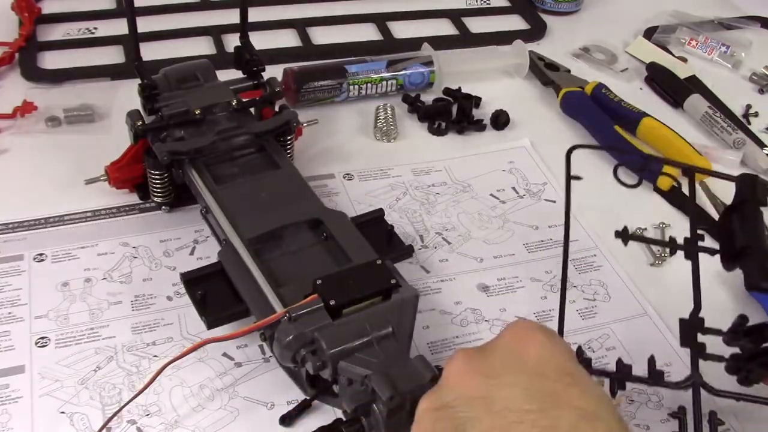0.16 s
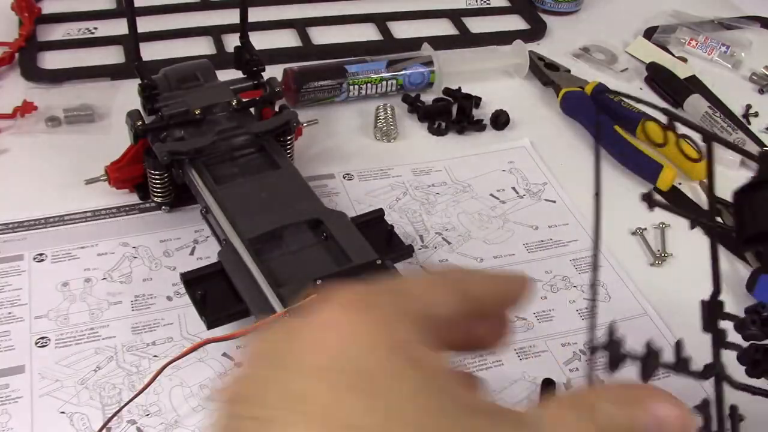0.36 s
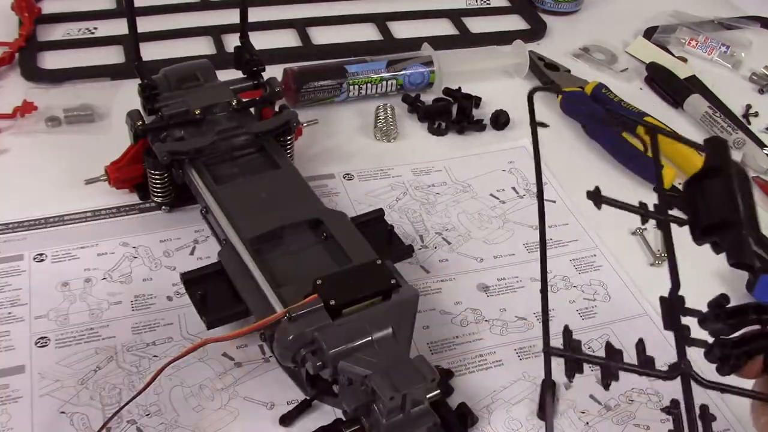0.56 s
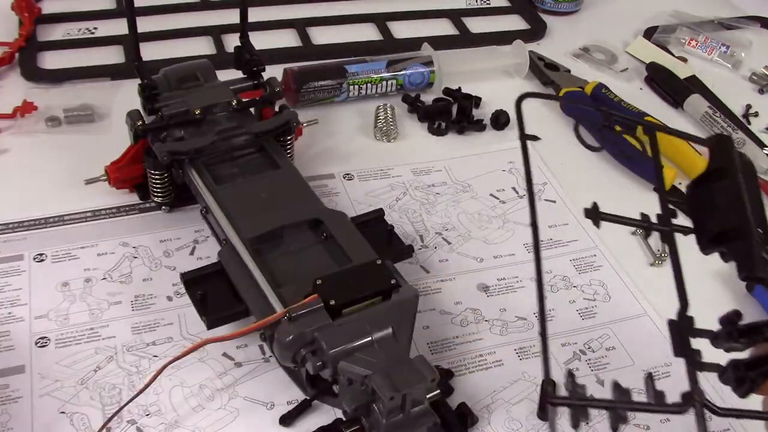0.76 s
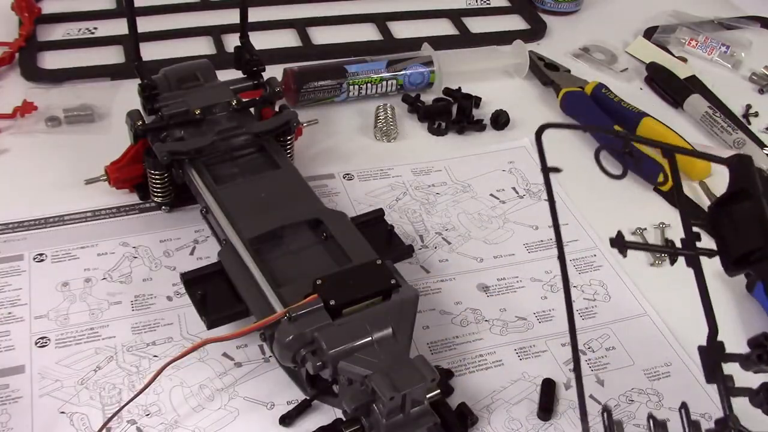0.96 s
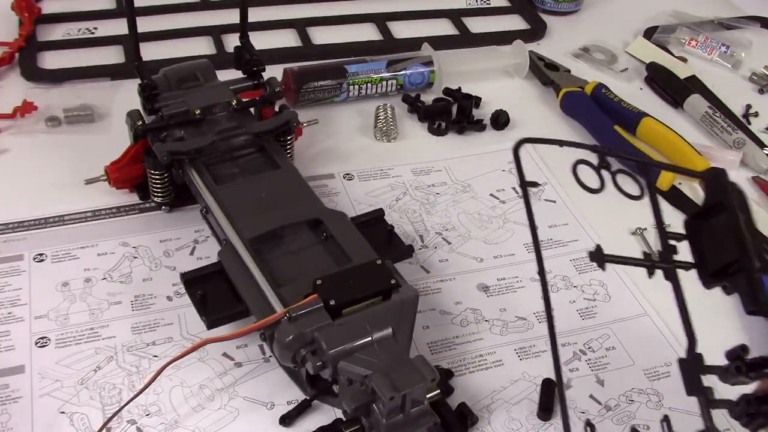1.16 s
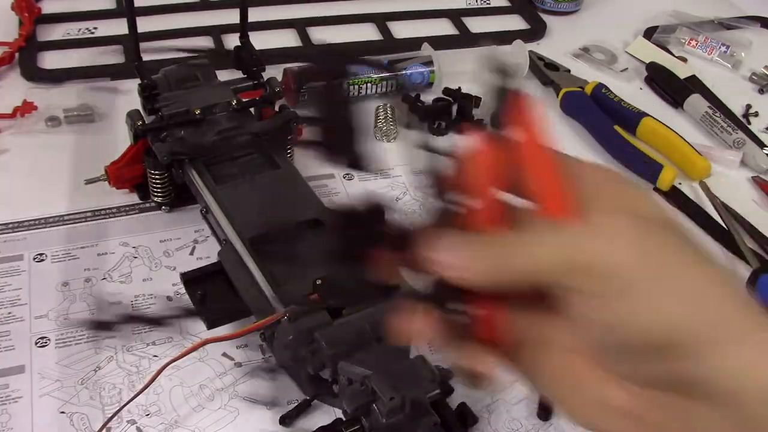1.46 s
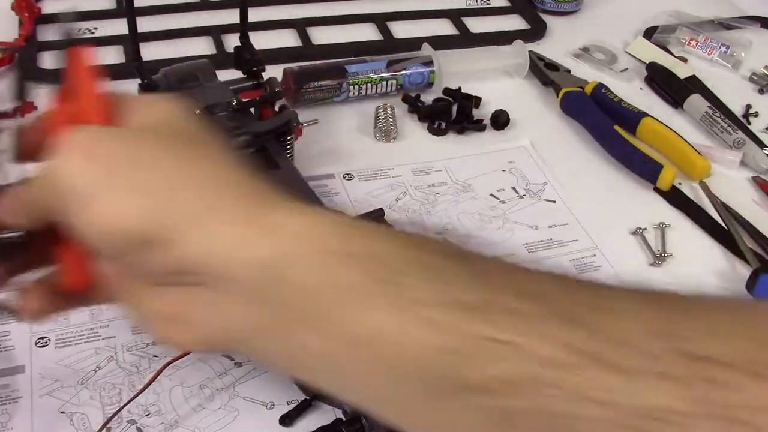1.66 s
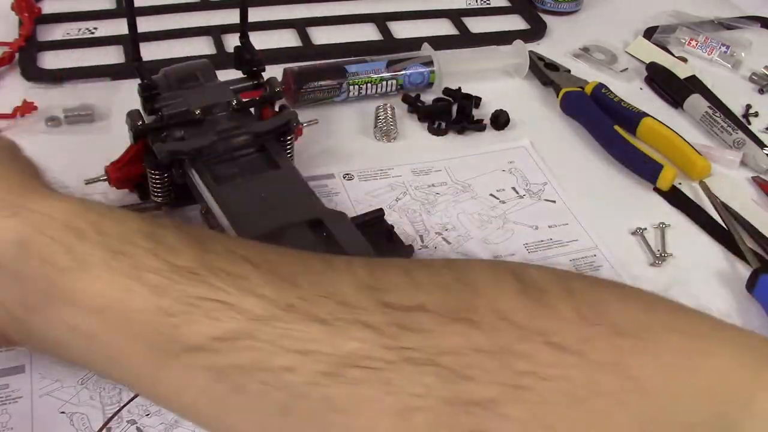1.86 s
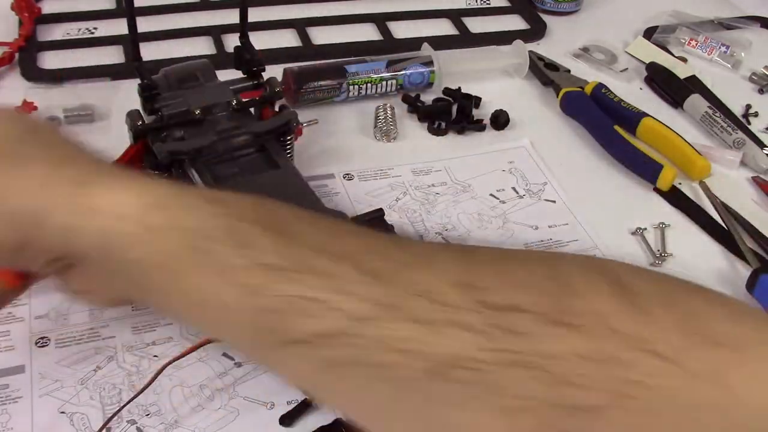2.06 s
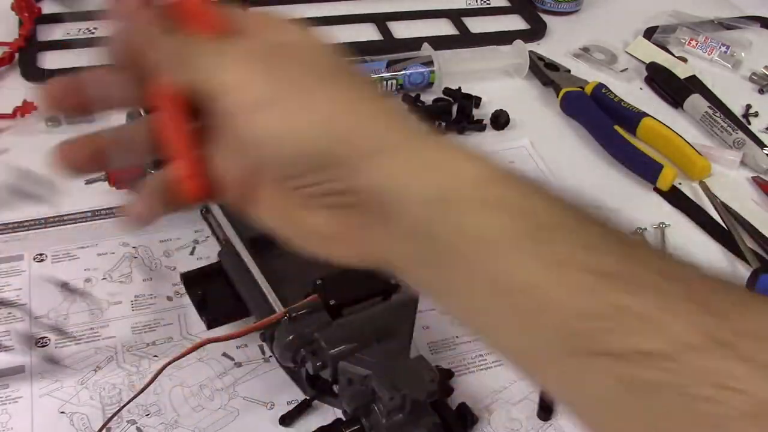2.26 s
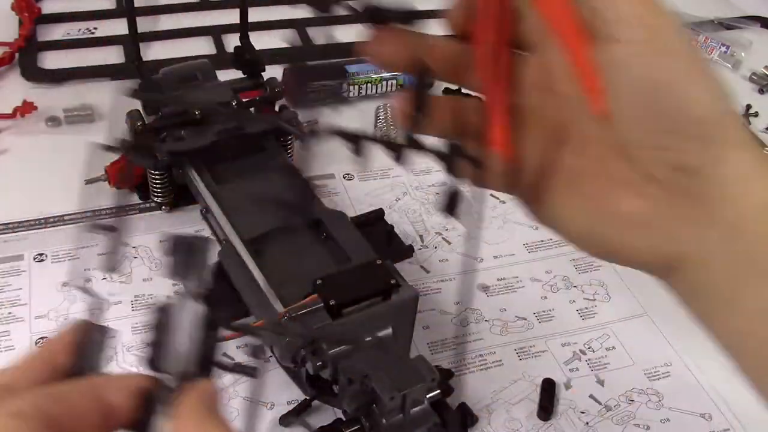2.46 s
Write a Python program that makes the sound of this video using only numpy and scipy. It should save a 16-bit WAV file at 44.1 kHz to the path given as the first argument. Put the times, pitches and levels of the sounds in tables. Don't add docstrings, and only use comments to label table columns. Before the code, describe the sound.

Light plastic parts snap and tick, an arm rustles past, then a plastic frame drops clattering

```python
import sys
import numpy as np
from scipy import signal
from scipy.fft import rfft, irfft
from scipy.io import wavfile
from scipy.ndimage import uniform_filter1d, map_coordinates

SR = 44100
rng = np.random.default_rng(int(sys.argv[2]) if len(sys.argv) > 2 else 0)


def attenuation_scalar(level_db):
    decades = np.asarray(level_db, float) / 20
    return 10 ** decades


def transcribe(signal):
    frames = np.atleast_2d(signal).T
    limited = np.clip(frames, -1, 1)
    pcm = np.round(limited * 32767).astype(np.int16)
    wavfile.write(sys.argv[1], SR, pcm)


N = 114660


def unit(x):
    return x / np.sqrt(np.mean(x ** 2) + 1e-20)


def wobble(rate_hz):
    knots = rng.standard_normal(int(N * rate_hz / SR) + 4)
    return map_coordinates(knots, [np.arange(N) * rate_hz / SR])


def noise(spectrum, patchy_db, size=N):
    z = signal.stft(rng.standard_normal(size + 1024), nperseg=512)[2]
    patches = uniform_filter1d(rng.standard_normal(z.shape), size=6, axis=0)
    patches = uniform_filter1d(patches, size=8, axis=1)
    x = signal.istft(z * attenuation_scalar(patchy_db * unit(patches)), nperseg=512)[1]
    f, db = np.transpose(spectrum)
    hz = np.fft.rfftfreq(len(x), 1 / SR)
    gain_db = np.interp(np.log(hz + 1), np.log(f + 1), db, -120, -120)
    coloured = irfft(rfft(x) * attenuation_scalar(gain_db), len(x))
    return unit(coloured[512:][:size])


def add(track, start_s, sound):
    part = track[round(start_s * SR):][:len(sound)]
    part += sound[:len(part)]


def ring(hz, t60_s, attack_s, rough):
    t = np.arange(SR // 8) / SR
    drift = rough * np.cumsum(rng.standard_normal(len(t))) / np.sqrt(SR)
    return np.sin(2 * np.pi * hz * t + drift) * attenuation_scalar(-60 * t / t60_s) * (1 - np.exp(-t / attack_s))


# pitch_hz [Hz], level_db [dB per Hz]
HISS_COLOUR = [(120, -46), (200, -3), (519, -7), (2170, -9), (6520, -13), (11700, -27), (16000, -24)]


def hiss():
    return attenuation_scalar(-62.5) * noise(HISS_COLOUR, patchy_db=4.0)


# time_s [s], rustle_db [dB], brightness_db [dB], air_stirred_db [dB]
ARM_MOTION = [(0, -41, 1, 1), (.09, -44, 3.5, -4), (.14, -49.5, -2, 11.5), (.25, -39.5, -1, -3.5),
              (.33, -45.5, -4.5, 5), (.43, -50, 6, 10.5), (.5, -44, 2.5, 3), (.6, -37.5, -2.5, 1.5),
              (.885, -39, -5, 0), (.95, -51, -3, 8.5), (1.1, -53.5, 2, 7.5), (1.31, -46, -2.5, 0.5),
              (1.4, -39, -3, -1.5), (1.67, -33, 1.5, -1), (1.86, -37.5, 1.5, -3), (1.94, -42.5, -3, 4),
              (2.1, -37, -2, -2), (2.6, -37, -5.5, -1)]
# pitch_hz [Hz], level_db [dB per Hz]
CLOTH_COLOUR = [(88, 2), (180, -3.5), (310, -2.5), (519, 0), (800, -4), (1500, -9), (2500, -19.5),
                (3900, -27), (6600, -120)]
# pitch_hz [Hz], level_db [dB per Hz]
FIZZ_COLOUR = [(1700, -12.5), (3310, 0), (4050, 1.5), (5000, -4.5), (6760, -6), (8480, -6.5),
               (12200, -15.5), (16000, -27)]
# pitch_hz [Hz], level_db [dB per Hz]
AIR_COLOUR = [(8.8, -18), (15, 3.5), (30, 0.5), (47, -5.5), (70, -12.5), (250, -21), (320, -50),
              (550, -120)]


def arm():
    time_s, *columns = np.transpose(ARM_MOTION)
    level_db, bright_db, air_db = [np.interp(np.arange(N) / SR, time_s, c) for c in columns]
    shared_db = level_db + 0.76 * wobble(35.34)
    body_db = shared_db + 0.89 * wobble(60)
    body = attenuation_scalar(body_db) * noise(CLOTH_COLOUR, patchy_db=0.54)
    fizz_db = shared_db + bright_db - 7.5 + 0.58 * wobble(150)
    fizz = attenuation_scalar(fizz_db) * noise(FIZZ_COLOUR, patchy_db=1.5)
    lumpy_db = level_db + air_db + 1 + 1.8 * wobble(30.0)
    air = attenuation_scalar(lumpy_db) * noise(AIR_COLOUR, patchy_db=1.1)
    return body + fizz + air


# centre_s [s], level_db [dB], pitch_hz [Hz], way [push +1, pull -1]
AIR_PUFFS = [(0.2773, -17, 171, -1), (0.2755, -23, 520, 1), (.3442, -26, 600, 1), (.298, -31, 150, 1),
             (.310, -27.5, 250, 1), (.343, -19, 224, -1), (1.415, -16, 41, 1), (1.4875, -16.5, 167, -1),
             (1.4885, -13, 520, 1), (1.492, -15, 38, 1), (1.5834, -15, 280, -1), (1.588, -16, 72, 1),
             (1.604, -22, 45, -1), (1.617, -24, 38, 1), (1.5811, -21, 560, -1), (1.640, -20, 54, 1),
             (1.650, -20, 50, -1), (1.6598, -18, 700, 1), (1.662, -20, 120, 1), (1.6641, -11, 270, -1),
             (1.668, -16.5, 110, 1), (1.684, -15.5, 42, 1), (1.714, -19, 16, -1), (1.762, -25, 120, 1),
             (1.7785, -23, 160, -1), (1.8335, -24, 220, 1), (1.836, -25, 150, -1), (1.884, -28, 200, -1),
             (1.896, -30, 190, 1), (2.2873, -17.5, 580, 1), (2.2857, -20, 130, -1), (2.293, -21, 52, 1)]


def puffs():
    out, t = np.zeros(N), np.arange(-SR // 20, SR // 20) / SR
    roundness = 1.55
    for centre_s, level_db, hz, way in AIR_PUFFS:
        u = np.abs(np.pi * hz * t) ** roundness
        swing = (1 - roundness * u) * np.exp(-u)
        add(out, centre_s - 1 / 20, np.sign(way) * attenuation_scalar(level_db) * swing)
    return out


# start_s [s],
# level_db [dB], length_s [s], brightest_hz [Hz]
FRICTION_SCUFFS = [(0, -52.5, 0.15, 9500), (0.197, -50, 0.18, 8500), (.205, -46, .06, 1200),
                   (.283, -50, 0.037, 4470), (0.857, -47, .022, 7500), (1.051, -45.5, 0.022, 5500),
                   (1.09, -59, 0.032, 10000), (1.128, -40, 0.025, 1110), (0.148, -54, 0.049, 3500),
                   (0.912, -56, .03, 9000), (1.127, -54, 0.019, 7000), (1.174, -54, 0.031, 4650),
                   (1.172, -47.5, 0.031, 9000), (2.071, -40, 0.015, 3970)]


def scuffs():
    out = np.zeros(N)
    for start_s, level_db, length_s, hz in FRICTION_SCUFFS:
        u = np.arange(8192) / SR / length_s
        colour = [(hz / 8, -10), (hz / 1.6, -7), (hz, 0), (hz * 1.32, -8), (hz * 3.0, -33), (hz * 6, -50)]
        grain = noise(colour, patchy_db=2.5, size=8192)
        stroke = (1 - np.exp(-u / 0.068)) * np.exp(-u ** 1.76)
        add(out, start_s, attenuation_scalar(level_db + 1.8 * wobble(528)[:8192]) * grain * stroke)
    return out


# start_s [s], level_db [dB], pitch_hz [Hz], t60_s [s]
PLASTIC_PINGS = [(0.156, -39, 3250, 0.027), (0.17, -28.5, 540, 0.05), (0.178, -34.5, 3290, 0.039),
                 (0.29, -39, 5700, 0.054), (.2535, -31, 1150, 0.044), (0.29, -42, 4000, .08),
                 (.306, -42, 5200, .03), (0.32, -45, 2540, 0.026), (.860, -42, 6700, .03),
                 (.863, -32.5, 4100, 0.057), (.864, -43, 8400, .03), (0.86, -44, 6700, .03),
                 (.9241, -22, 7900, 0.0064), (.9241, -24, 10800, 0.0059), (.9655, -44, 5330, .012),
                 (.9845, -44, 5100, .012), (1.0525, -37, 3700, .03), (1.052, -42, 6600, 0.041),
                 (1.054, -40.5, 1780, .04), (1.053, -30.5, 470, 0.022), (1.126, -45, 7100, 0.065),
                 (1.130, -39.5, 2080, 0.033), (1.130, -42, 3140, 0.02), (1.171, -44, 6900, 0.12),
                 (1.188, -45, 6600, .04), (1.197, -45, 3800, .02), (1.138, -34.5, 250, .06),
                 (1.170, -36, 1170, .012), (1.178, -44, 4800, .06), (1.194, -32, 370, 0.018),
                 (1.102, -47, 6700, .2), (1.113, -41.5, 4070, 0.066), (1.1265, -31, 850, 0.065),
                 (1.126, -34.5, 1250, 0.04), (1.170, -33.5, 2400, 0.0063), (1.1885, -28.5, 370, 0.021),
                 (1.2412, -27, 280, 0.028), (1.9805, -13.5, 781, 0.051), (1.991, -19, 700, .08),
                 (1.9782, -14, 3725, 0.04), (1.9715, -20, 2920, .02), (1.952, -24.5, 8300, .05),
                 (2.061, -30, 3700, 0.045), (2.044, -30, 4100, 0.022)]


def pings():
    out = np.zeros(N)
    for start_s, level_db, hz, t60_s in PLASTIC_PINGS:
        flutter = attenuation_scalar(2.96 * wobble(402)[:SR // 8])
        tone = ring(hz, t60_s, t60_s / 40, rough=hz ** .5 / 2.14)
        add(out, start_s, attenuation_scalar(level_db) * flutter * tone)
    return out


# centre_s [s], peak_db [dB], pitch_hz [Hz], second_hz [Hz], second_db [dB re first]
PLASTIC_SNAPS = [(.1528, -34, 5000, 11000, -2), (.1574, -38.5, 10000, 8000, -4),
                 (.1748, -28.5, 5200, 10300, -8), (.1793, -33.5, 10700, 4000, 6),
                 (.4132, -25, 8200, 12500, -15), (.5871, -29, 7300, 12600, -5.5),
                 (1.0538, -30, 3720, 6700, -8), (.6652, -31, 11500, 14500, -2),
                 (.6824, -14, 8200, 13000, -15), (.8915, -44, 10500, 5000, 1), (.9148, -39, 8200, 4170, 0),
                 (.9195, -29, 8100, 14500, -17), (.9217, -29, 10800, 8780, -1),
                 (.9244, -30, 8500, 10840, -1), (.9247, -32, 14100, 12500, -11),
                 (.9467, -26, 7600, 6190, -8), (.966, -43, 9500, 11000, 0), (.9691, -47, 11500, 14000, -2),
                 (1.0259, -32, 11060, 8000, -4), (1.1706, -31.5, 5500, 2480, 0.5),
                 (1.6145, -16, 8000, 13000, -16)]


def snaps():
    out, t = np.zeros(N), np.arange(-64, 64) / SR
    width_s, tail_db, tail_t60_s = 0.00011, -12, 0.0043
    for centre_s, peak_db, hz, second_hz, second_db in PLASTIC_SNAPS:
        first = np.cos(2 * np.pi * hz * t)
        second = attenuation_scalar(second_db) * np.cos(2 * np.pi * (second_hz * t + rng.random()))
        burst = (first + second) * np.exp(-(t / width_s) ** 2 / 2)
        add(out, centre_s - 64 / SR, attenuation_scalar(peak_db) * burst)
        add(out, centre_s, attenuation_scalar(peak_db + tail_db) * ring(hz, tail_t60_s, 0.00033, rough=40))
    return out


# start_s [s], level_db [dB], ring_db [dB re level],
# rattle_t60_s [s], treble_tilt_db [dB per octave]
FRAME_TOUCHES = [
    (1.9483, -24.5, -23, 0.21, 2),
    (1.953, -27, -8, 0.2, -0.5),
    (1.970, -27, -8, .08, -3.5),
    (1.978, -22, -2, 0.15, 0),
    (1.991, -20.5, -14, 0.12, 0.5),
    (2.010, -28, -16, 0.14, -5),
    (2.058, -33, -10, 0.11, 1.5),
]
# pitch_hz [Hz], level_db [dB], t60_s [s]
FRAME_MODES = [(781, -9, 0.08), (506, -11, 0.089), (876, -8, 0.052), (2000, 0, 0.045), (2830, -5.5, 0.052),
               (3470, -1, 0.055), (3730, -1, 0.045), (4270, -7, 0.06), (5130, -12, 0.06), (5500, -7, .06),
               (5930, -3, .03), (6500, -10, .06), (8400, -9.5, .05)]
# pitch_hz [Hz], level_db [dB per Hz]
RATTLE_COLOUR = [(150, -30), (250, -9.5), (788, -8.5), (1500, -15.5), (3280, -11.5), (3770, -11),
                 (4730, -12), (11300, -22.5), (16000, -36)]


def frame():
    out, t = np.zeros(N), np.arange(8192) / SR
    for start_s, level_db, ring_db, rattle_t60_s, tilt_db in FRAME_TOUCHES:
        modes = np.zeros(SR // 8)
        for hz, mode_db, t60_s in FRAME_MODES:
            strike = attenuation_scalar(mode_db + rng.normal(0, 1.8))
            modes += strike * ring(hz, t60_s, 0.00071, rough=14) * rng.choice([-1, 1])
        colour = [(hz, db + tilt_db * np.log2(hz / 3000)) for hz, db in RATTLE_COLOUR]
        grit = attenuation_scalar(2.1 * wobble(913)[:len(t)])
        fade = attenuation_scalar(-60 * t / rattle_t60_s) * (1 - np.exp(-t / 0.00076))
        rattle = noise(colour, patchy_db=-3, size=len(t)) * grit * fade
        add(out, start_s, attenuation_scalar(level_db) * rattle)
        add(out, start_s, attenuation_scalar(level_db + ring_db + 3.5) * modes)
    return out


def room(x):
    t = np.arange(SR // 3) / SR
    t60_s = 0.18
    tail = rng.standard_normal(len(t)) * attenuation_scalar(-60 * t / t60_s) * (1 - np.exp(-t / 0.0063))
    return signal.fftconvolve(x, tail / np.linalg.norm(tail))[:N]


def scene():
    hits = scuffs() + pings() + snaps() + frame()
    mix = hiss() + arm() + puffs() + hits + attenuation_scalar(-21) * room(hits)
    return mix[None]


def band_limit(x):
    return signal.sosfilt(signal.butter(12, 16500, fs=SR, output="sos"), x)


def record(dry):
    low = signal.sosfiltfilt(signal.butter(24, 15850, fs=SR, output="sos"), dry)
    return band_limit(low)


dry = scene()
out = record(dry)
transcribe(out)
```